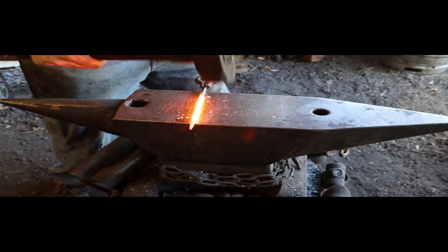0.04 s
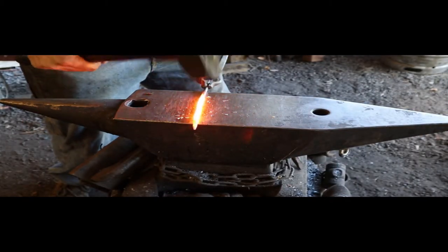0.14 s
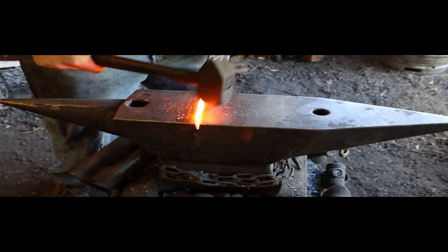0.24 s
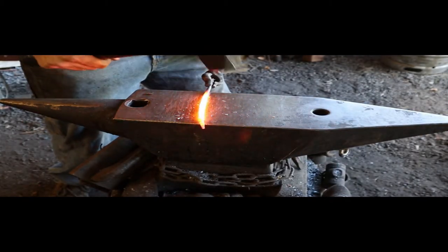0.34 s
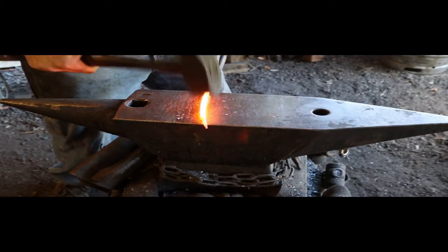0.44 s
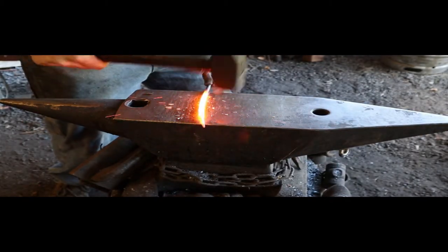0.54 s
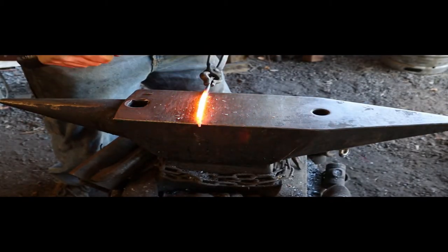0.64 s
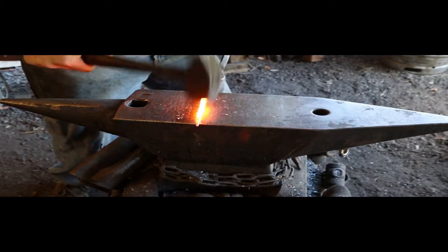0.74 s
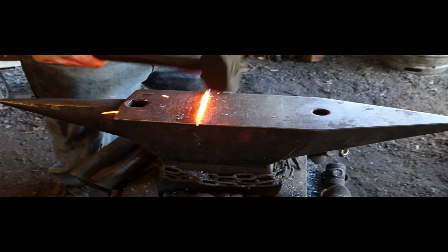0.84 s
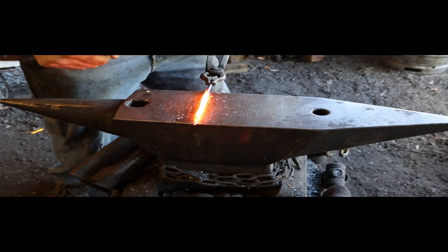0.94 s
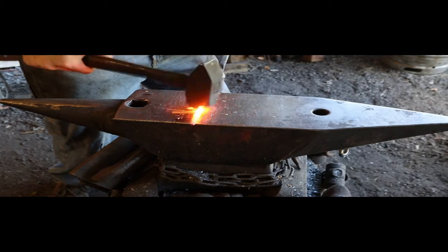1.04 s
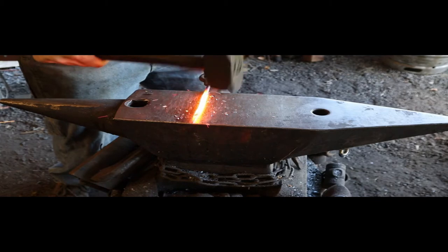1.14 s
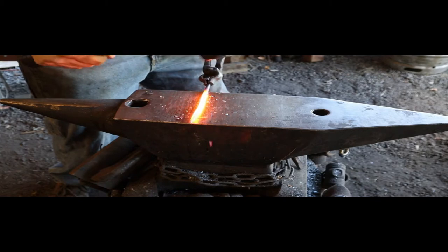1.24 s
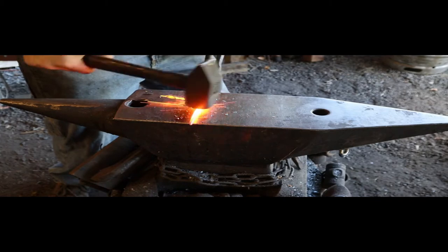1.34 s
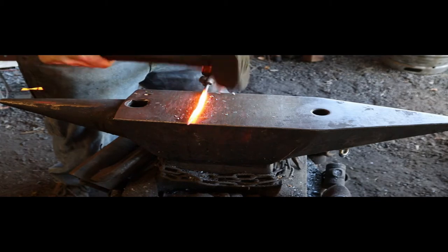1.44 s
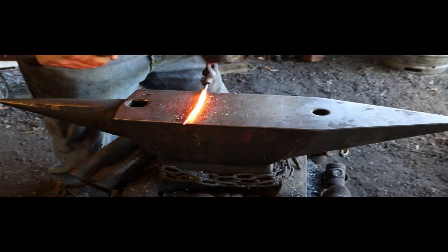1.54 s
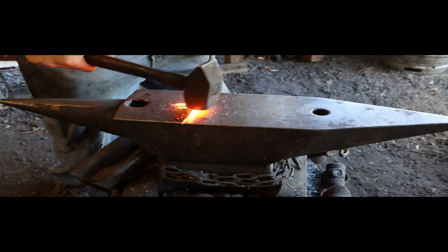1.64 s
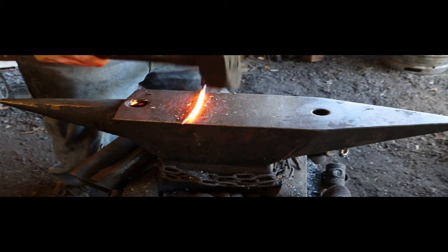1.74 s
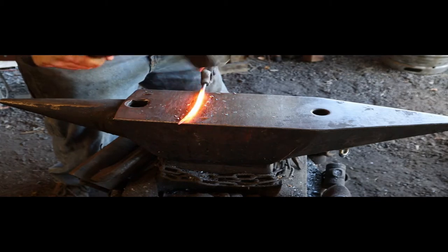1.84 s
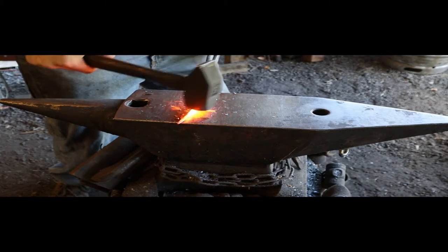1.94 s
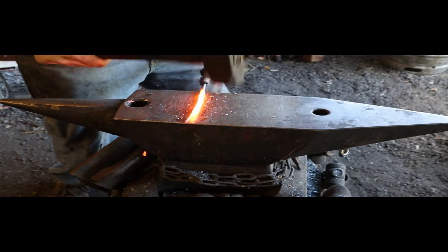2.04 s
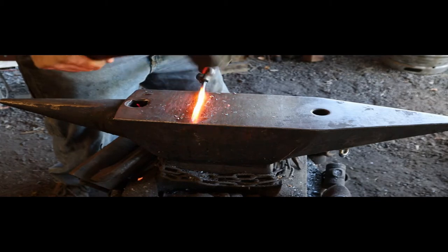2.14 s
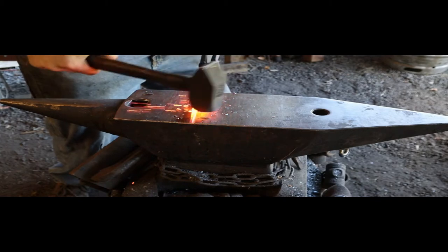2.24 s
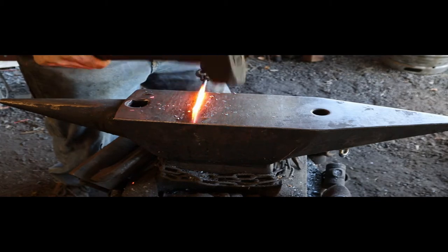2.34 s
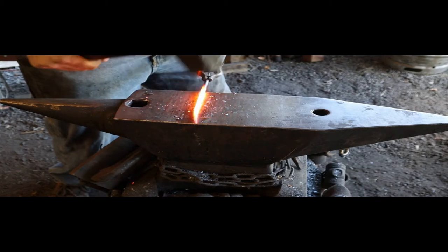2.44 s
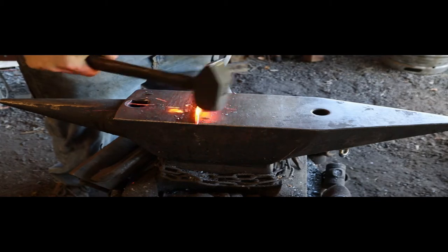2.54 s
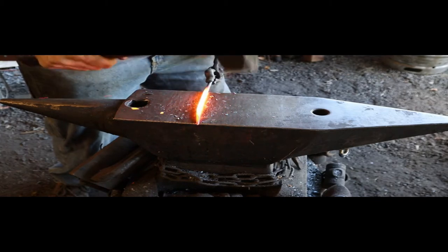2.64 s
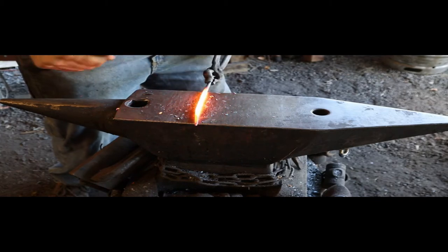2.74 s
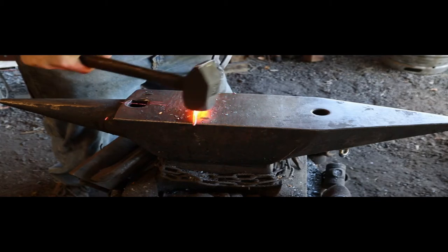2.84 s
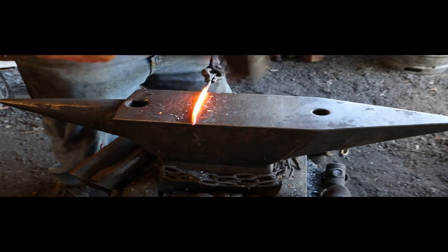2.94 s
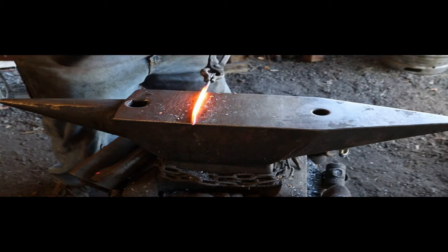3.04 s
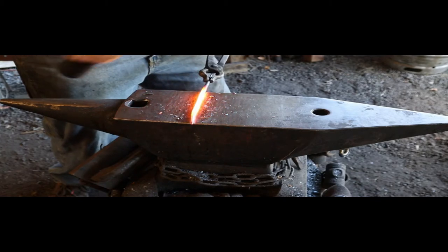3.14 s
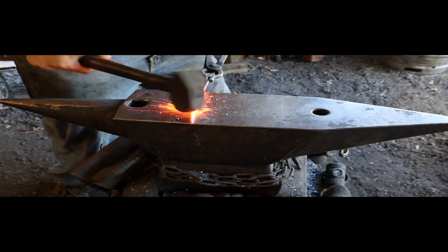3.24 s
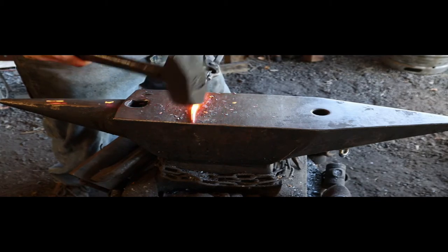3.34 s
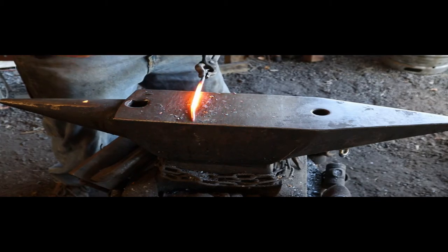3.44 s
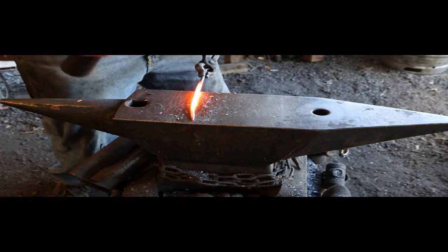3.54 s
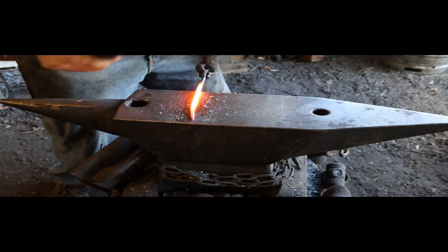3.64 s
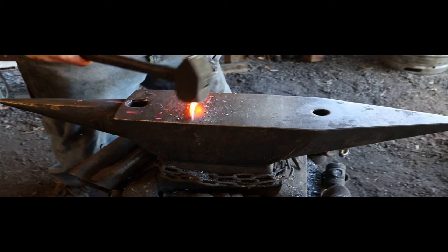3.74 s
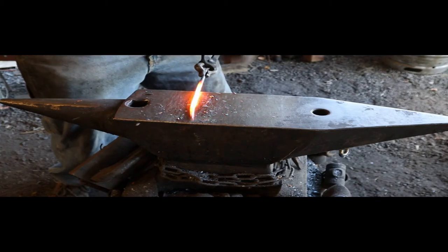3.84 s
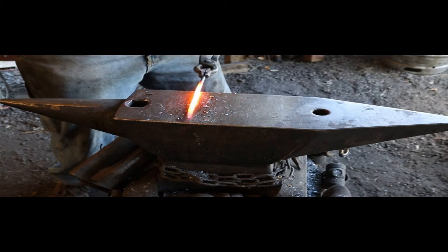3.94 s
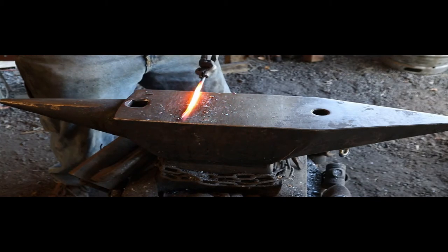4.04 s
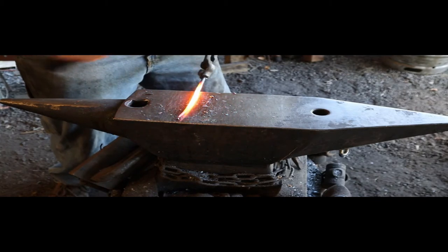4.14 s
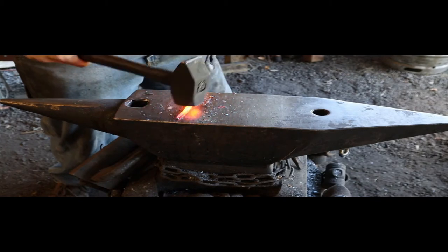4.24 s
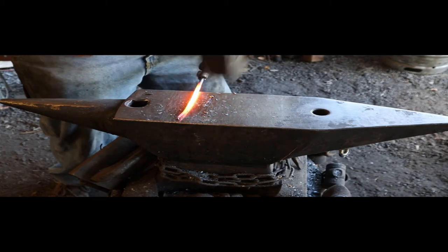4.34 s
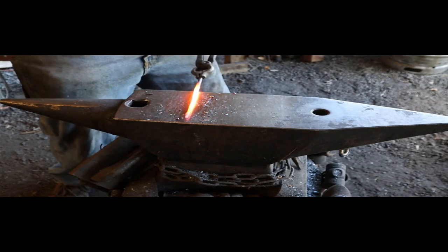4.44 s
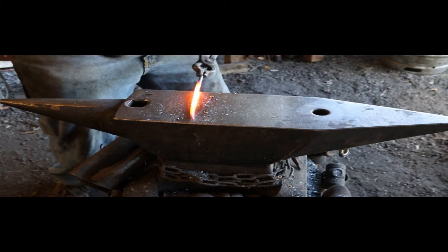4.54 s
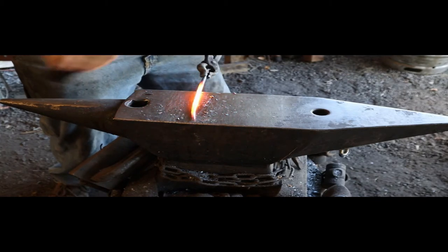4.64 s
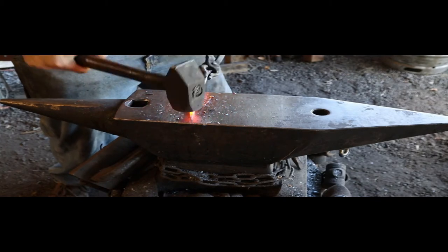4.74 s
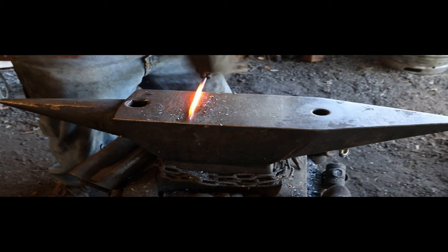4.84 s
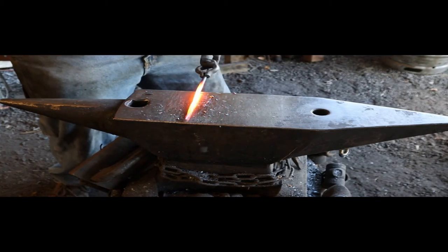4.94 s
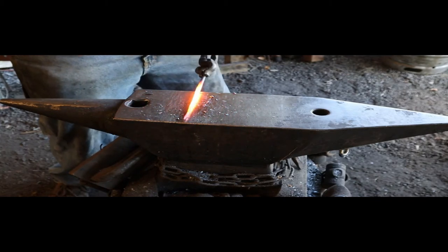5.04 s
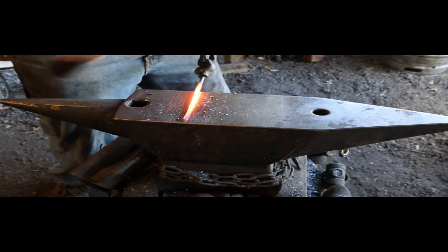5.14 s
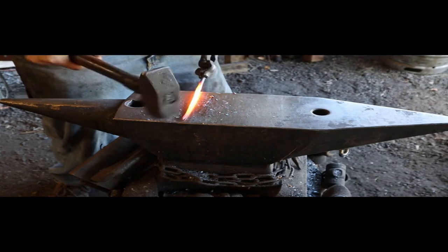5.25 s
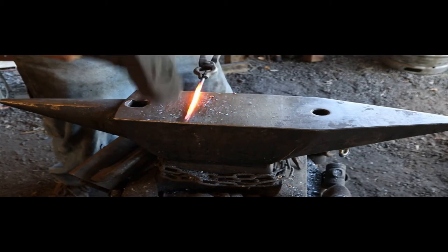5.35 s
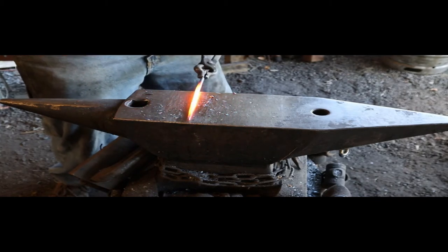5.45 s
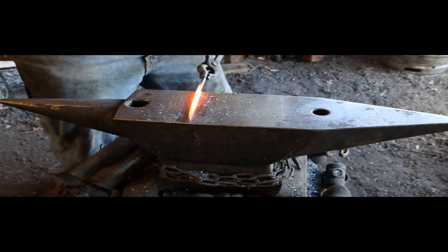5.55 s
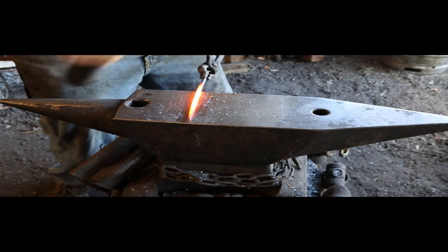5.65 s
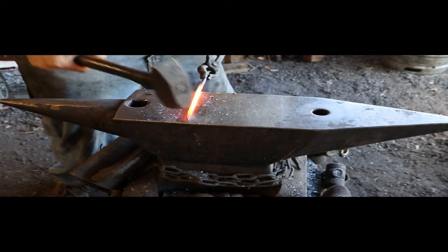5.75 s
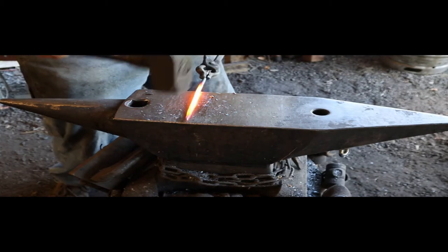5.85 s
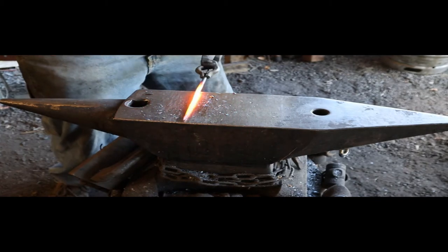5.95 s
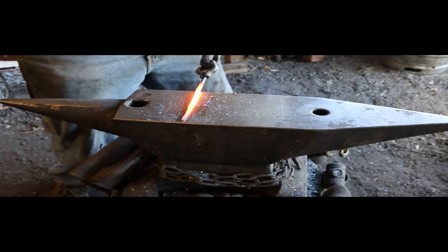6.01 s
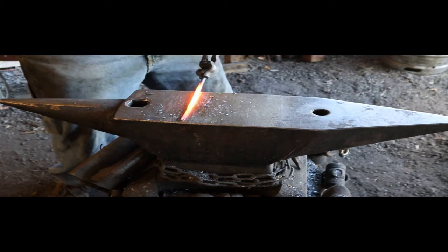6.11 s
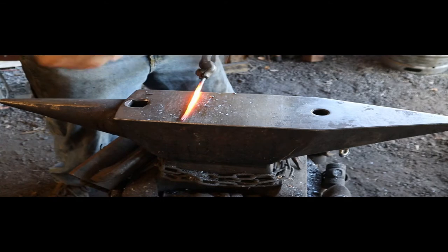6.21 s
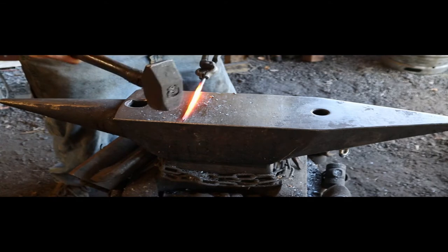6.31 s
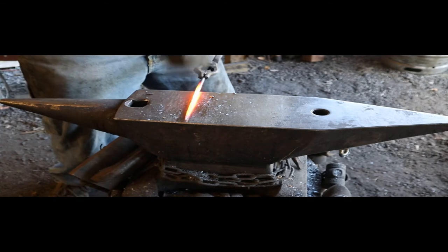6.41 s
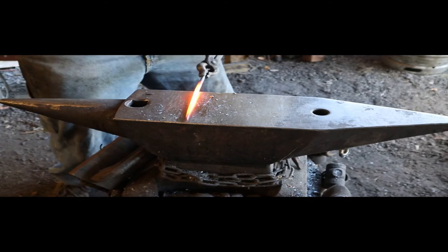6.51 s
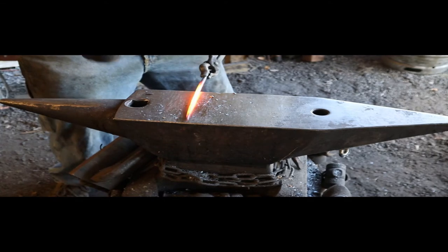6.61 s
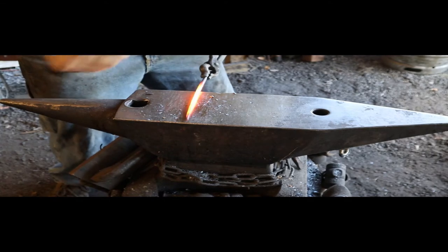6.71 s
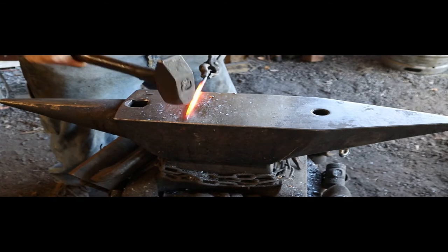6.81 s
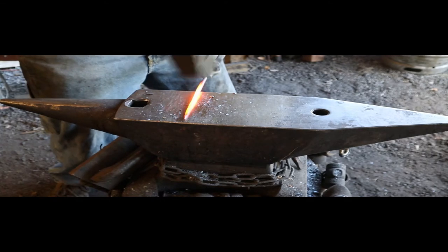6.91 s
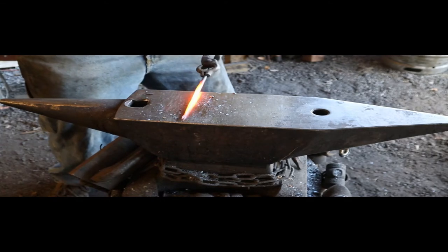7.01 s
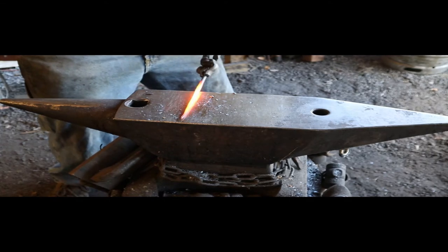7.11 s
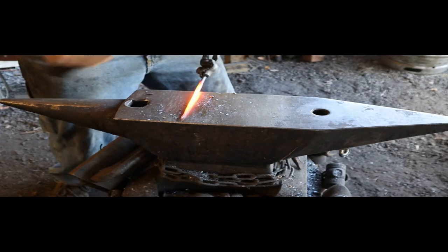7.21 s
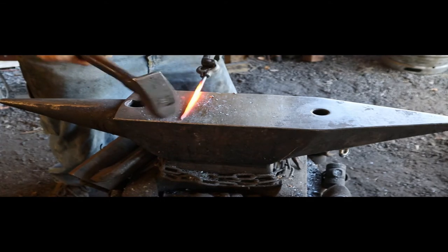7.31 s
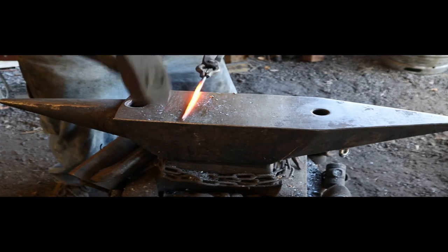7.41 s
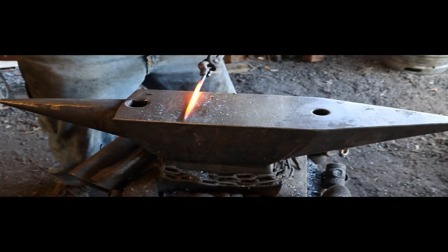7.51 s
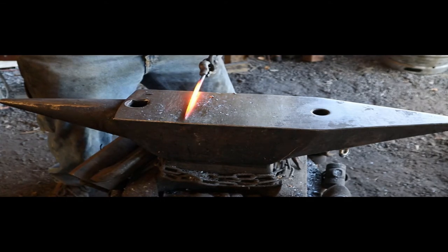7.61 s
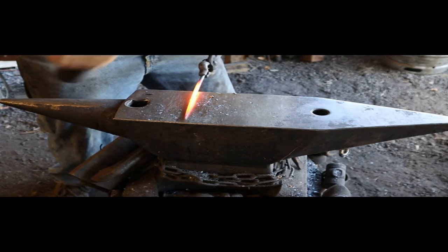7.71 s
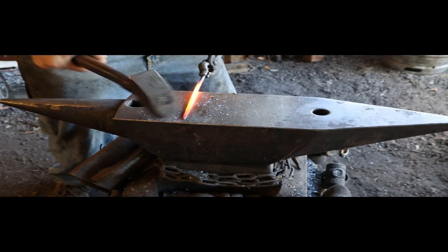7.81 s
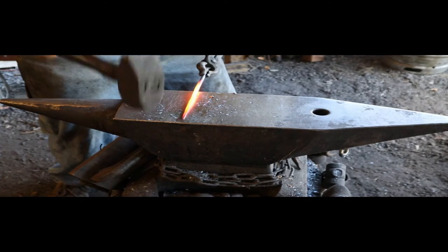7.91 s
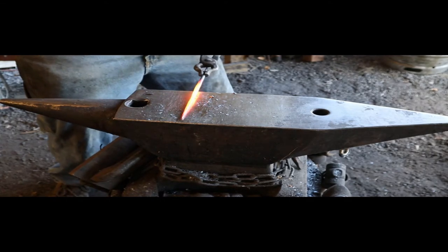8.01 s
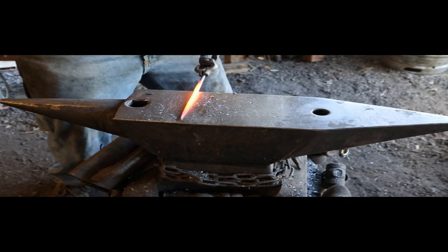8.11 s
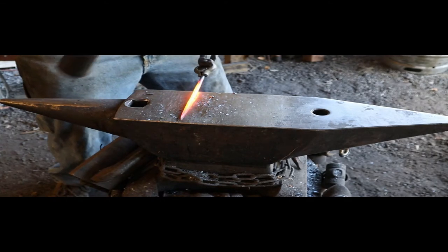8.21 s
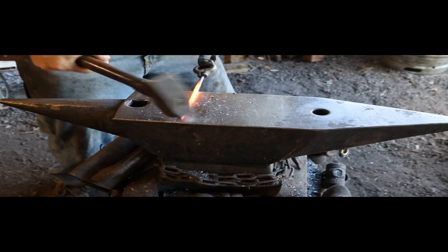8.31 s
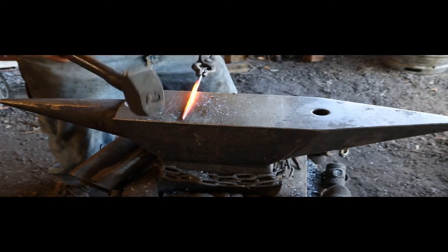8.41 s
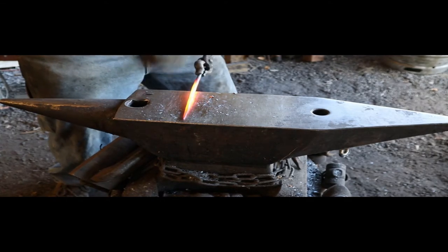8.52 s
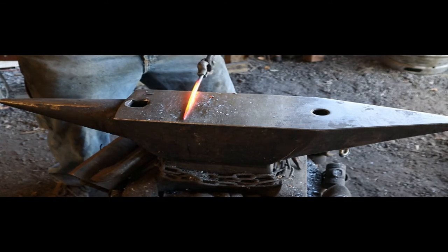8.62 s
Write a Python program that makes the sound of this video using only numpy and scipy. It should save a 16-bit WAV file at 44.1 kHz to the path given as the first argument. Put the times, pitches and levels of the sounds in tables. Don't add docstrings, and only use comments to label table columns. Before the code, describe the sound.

A hand hammer beats a hot steel bar on a chained anvil in an open shed, heard very close. Early blows come quickly, dull and thudding with a little scale hiss; later ones slow to about two a second and ring brighter as the bar cools. Chain and tongs jingle briefly after each hit. A high cricket trill and soft outdoor rumble fill the gaps.

```python
import sys
import numpy as np
from scipy import signal
from scipy.io import wavfile

SR = 44100
rng = np.random.default_rng(int(sys.argv[2]) if len(sys.argv) > 2 else 0)


def gain_from_decibels(decibels):
    exponent = np.asarray(decibels, float) / 20
    return 10 ** exponent


def generate_wav(signal):
    frames = np.transpose(np.atleast_2d(signal))
    scaled = np.clip(frames, -1, 1) * 32767
    pcm = np.round(scaled).astype(np.int16)
    wavfile.write(sys.argv[1], SR, pcm)


N = 382347
TAIL = 16000

# t/s, knock/dB, thud/dB, anvil ring/dB, hammer head/dB
BLOWS = [(0.0057, -49, -37.5, -59.5, -59), (0.2782, -41, -39, -50.5, -63), (0.5533, -41.5, -40, -59.5, -65),
         (0.8266, -45, -41, -57.5, -60.5), (1.1152, -40, -40.5, -54.5, -60),
         (1.405, -38.5, -43, -51.5, -54.5), (1.6941, -49, -40, -90, -61.5), (1.986, -41.5, -40, -52, -67),
         (2.2826, -41, -40, -52, -62), (2.5739, -43, -40, -57, -61.5), (2.8674, -55.5, -41.5, -78.5, -61),
         (3.179, -37.5, -39, -45.5, -56.5), (3.5949, -39, -36, -45, -55.5), (4.0388, -38, -34, -53, -60),
         (4.5633, -39, -33.5, -50.5, -60), (5.062, -33.5, -34, -43, -46), (5.565, -37, -32.5, -43.5, -49),
         (6.0767, -30, -34, -43, -45), (6.6041, -32, -33, -44, -47.5), (7.1166, -30.5, -35, -47.5, -46.5),
         (7.629, -33.5, -35, -44.5, -49), (8.138, -35, -34.5, -47, -47.5),
         (8.6604, -34.5, -31.5, -46.5, -60.5)]


def at_hz(points, hz):
    table_hz, values = np.transpose(points)
    return np.interp(np.log(hz), np.log(table_hz), values)


def rms_one(x):
    return x / np.sqrt(np.mean(x ** 2) + 1e-20)


def band_pass(x, low_hz, high_hz):
    return signal.sosfilt(signal.butter(2, [low_hz, high_hz], "band", fs=SR, output="sos"), x)


def noise_bands(size, likeness, low_hz=22):
    edges = low_hz * 2 ** np.arange(0, np.log2(19000 / low_hz), 0.5)
    white = rng.standard_normal((2, 2, size))
    for k, (low, high) in enumerate(zip(edges, edges[1:])):
        mid, side = band_pass(white[k % 2], low, high)
        hz = np.sqrt(low * high)
        alike = np.clip(at_hz(likeness, hz), -1, 1)
        yield hz, np.sqrt(1 + alike) * mid + np.sqrt(1 - alike) * side * [[1], [-1]]


def since_blow():
    t, blow_s = np.arange(N) / SR, np.array(BLOWS)[:, 0]
    last = np.maximum(np.searchsorted(blow_s, t) - 1, 0)
    return last, t - blow_s[last]


def air():
    # f/Hz, density/dB per Hz
    colour = [(22, -12), (50, -1.5), (100, -8.5), (220, -16), (800, -17.5), (4500, -29), (10000, -35.5),
              (15000, -63.5)]
    # f/Hz, left-right likeness
    likeness = [(60, 0.99), (150, 0.81), (380, 0.39), (950, -0.01), (2380, -0.41), (5980, 0.3),
                (15000, 0.98)]
    floor = sum(gain_from_decibels(at_hz(colour, hz)) * band for hz, band in noise_bands(N, likeness))
    return gain_from_decibels(-58.5) * rms_one(floor) * gain_from_decibels([[-0.8], [0.8]])


def crickets(strokes_per_s, top_hz, fall_hz):
    # t/s, lead/strokes, level/dB
    trill = [
        (0, 0.27, -65),
        (1.2, 0.44, -66),
        (2.15, 0.74, -69),
        (2.9, 0.95, -66),
        (3.9, 0.86, -66.5),
        (5.9, 0.84, -69),
        (6.3, 0.45, -77),
        (6.9, 0.84, -67.5),
        (7.4, 0.89, -68),
        (8.67, 0.84, -68),
    ]
    # f/Hz, width/Hz, level/dB
    far = [(3420, 260, -77), (5600, 450, -82), (7500, 800, -78)]
    t = np.arange(N) / SR
    s, lead, db = np.transpose(trill)
    stroke = (strokes_per_s * t + np.interp(t, s, lead) + 0.5) % 1
    pulses = [(0.2, 0.6), (0.48, 0.85), (0.72, 1)]
    swell = sum(size * np.exp(-((stroke - at) / 0.11) ** 2) for at, size in pulses)
    pitch = top_hz - fall_hz * np.clip(stroke - 0.55, 0, 1) ** 2
    rough = signal.lfilter([1], [1, -0.96], rng.standard_normal(N))
    uneven = 1 + 0.6 * rms_one(rough)
    tone = np.sin(2 * np.pi * np.cumsum(pitch) / SR)
    level = gain_from_decibels(np.interp(t, s, db) + 6.0)
    out = level * uneven * swell * tone * gain_from_decibels([[-1.2], [0]])
    for hz, width_hz, db in far:
        chorus = band_pass(rng.standard_normal((2, N)), hz - width_hz / 2, hz + width_hz / 2)
        out = out + gain_from_decibels(db) * rms_one(chorus)
    return out


def ground():
    # f/Hz, delay/s, spread/s, level under the thud/dB
    thump = (40, .068, .03, -11)
    hz, delay_s, spread_s, under_db = thump
    last, since = since_blow()
    swell = np.exp(-((since - delay_s) / spread_s) ** 2)
    return gain_from_decibels(np.array(BLOWS)[last, 2] + under_db) * swell * np.cos(2 * np.pi * hz * (since - delay_s))


def sizzle(fade_s):
    # t/s, level/dB
    heat = [
        (0, -43),
        (1, -62),
        (3.002, -58),
        (4.499, -60),
        (8.67, -92),
    ]
    # t/s, level/dB
    flakes = [
        (3.934, -63.5),
        (4.33, -61.5),
        (5.0388, -61),
        (5.398, -57.5),
        (5.432, -65.5),
        (5.501, -59),
        (5.525, -65),
    ]
    grains = rms_one(rng.standard_normal((2, N)) * gain_from_decibels(2.5 * rng.exponential(1, N)))
    heat_db = np.interp(np.arange(N) / SR, *np.transpose(heat))
    grains = grains * gain_from_decibels(heat_db - 60 * np.abs(since_blow()[1]) / fade_s)
    for s, db in flakes:
        grains[:, round(s * SR):][:, :40] += gain_from_decibels(db) * rng.standard_normal(40)
    return band_pass(grains, 5500, 13000)


def rattle(crack_db, crack_s, t60):
    # f/Hz, density/dB per Hz
    loose_iron = [(2200, -6.5), (3300, -2), (5400, -6), (7600, -12), (8600, -1.5), (10600, 2.5),
                  (12200, -11.5), (15500, -35.5)]
    # f/Hz, left-right likeness
    likeness = [(2000, .4), (5000, 0.12), (8000, 1), (15000, 0.71)]
    last, since = since_blow()
    knock_db, head_db = np.array(BLOWS)[last][:, [1, 4]].T
    jingle = gain_from_decibels(-60 * (since - 0.08) / t60)
    crack = gain_from_decibels(crack_db - 60 * since / crack_s)
    out = 0
    for hz, band in noise_bands(N, likeness, low_hz=1985):
        high = np.clip(np.log2(hz / 3500) / 2.9, 0, 1)
        drive_db = (1 - high) * (knock_db - 5.5) + high * (head_db - 12.0)
        out = out + band * gain_from_decibels(at_hz(loose_iron, hz) + drive_db)
    return (since > 0) * (jingle + crack) * out


def shed(wet_db):
    # f/Hz, t60/s
    decay = [(150, .36), (400, 0.33), (1000, 0.24), (2800, 0.25), (7000, 0.22), (14000, 0.081)]
    # f/Hz, left-right likeness
    likeness = [(60, 0.94), (150, 0.97), (380, 0.93), (950, 0.69), (2380, 0.35), (5980, 0.08),
                (15000, 0.95)]
    # t/s, level over the diffuse tail/dB
    echoes = [
        (0.009, 6.5),
        (0.012, 3.5),
        (0.036, 0),
        (0.043, -5),
        (0.057, 5),
    ]
    # t/s, level/dB
    slaps = [
        (.0328, -20),
        (0.015, -23),
    ]
    t = np.arange(TAIL) / SR
    tail = sum(band * gain_from_decibels(-60 * t / at_hz(decay, hz)) for hz, band in noise_bands(TAIL, likeness))
    lumps_db = sum(db * np.exp(-((t - s) / 0.0022) ** 2) for s, db in echoes)
    onset = np.clip((t - 0.002) / 0.0058, 0, 1)
    response = gain_from_decibels(wet_db + lumps_db) * tail * onset
    response[:, 0] = 1
    for s, db in slaps:
        response[:, round(s * SR)] += gain_from_decibels(db)
    return response


def aside(room):
    return np.array([room[0], np.roll(room[1], 2)])


def struck(modes, room, turn, rise_s):
    hz, db, t60 = np.transpose(modes)[:, :, None, None]
    t = np.arange(TAIL) / SR
    apart = turn * rng.uniform(0.18, 1, hz.shape) * [[1], [-1]]
    dying = gain_from_decibels(db - 60 * t / t60) * (1 - np.exp(-t / rise_s))
    dry = dying * np.sin(2 * np.pi * hz * t + apart)
    heard = signal.fftconvolve(dry, room[None], axes=2)[:, :, :TAIL]
    together = heard.sum(axis=0).mean(axis=0)
    return heard / np.sqrt(np.mean(together[2600:4400] ** 2))


def anvil(room):
    # f/Hz, level/dB, t60/s
    knock = [(1210, -2.5, .009), (1459, 11, 0.005), (1674, 5, 0.0054), (1903, -6.5, 0.0074),
             (2500, -6.5, 0.0075), (3245, -11.5, 0.012), (4740, -11, 0.0053), (6376, -20.5, 0.013)]
    # f/Hz, level/dB, t60/s
    thud = [(233, -10.5, 0.0087), (336, 6.5, 0.015), (415.5, -25, 0.21), (496, -8, 0.03)]
    # f/Hz, level/dB, t60/s
    stand = [(817.6, -26.5, 0.29), (908.8, 5, 0.023), (1000, -3.5, 0.033), (749.3, -21.5, 0.11)]
    return [(struck(knock, room, turn=0.13, rise_s=0.003), -3, 1.5),
            (-struck(thud, room, turn=0.05, rise_s=0.003), -3, 1.2),
            (struck(stand, room, turn=0.1, rise_s=0.0017), -3, 1.2)]


def iron(room, near):
    # f/Hz, level/dB, t60/s
    bend = [(2110, 0, .17), (1841, -7, .15), (1690, -9, .13), (2649, -20, .15)]
    # f/Hz, level/dB, t60/s
    head = [(8900, -1, 0.013), (9900, -2, 0.009), (10600, 1, .014), (11550, -1, .012), (13500, -10, .008)]
    # f/Hz, level/dB, t60/s
    families = [
        [(3650, 0, .2), (3755, -7, .09), (3560, -12, .08)],
        [(4180, 0, .13), (5114, -10, .12), (4740, -20, .08)],
        [(6080, 0, .13), (5790, -9, .09), (6982, -10, .1), (6600, -16, .08)],
        [(8660, 0, .14), (8505, -6, .1), (8890, -7, .1), (8990, -3, .13), (9720, -10, .09)],
        [(10640, 0, .14), (10150, -9, .1), (10277, -4, .12), (10355, -5, .1), (10760, -6, .1), (11380, -9, .1),
         (11490, -5, .12), (11570, -4, .13), (11940, -9, .06)],
    ]
    bodies = [(struck(bend, aside(near), turn=0.2, rise_s=0.00084), -3, 1.5),
              (struck(head, room, turn=0.57, rise_s=0.0007), -12, 3)]
    for family in families[:2]:
        bodies.append((struck(family, aside(near), turn=0.17, rise_s=0.0002), -3, 1.5))
    for family in families[2:]:
        bodies.append((struck(family, near, turn=0.3, rise_s=0.0002), -3, 2.5))
    return bodies


def body_levels():
    # level at a middling blow/dB, slope/dB per dB of anvil ring, slope/dB per dB of hammer head
    family_laws = [(-52.5, 1.0, 0.0), (-59, 0.48, 0.96), (-65.5, 0.74, 0.8), (-69.5, -0.4, 1.76),
                   (-74.5, -0.2, 1.47)]
    mean_knock_db, mean_ring_db, mean_head_db = -40, -50, -55
    glancing_db = -54.5
    s, knock, thud, ring, head = np.transpose(BLOWS)
    stand = thud + 0.5 * np.minimum(ring - glancing_db, 0)
    bend = -50 + 1.7 * (knock - mean_knock_db)
    upper = [db + by_ring * (ring - mean_ring_db) + by_head * (head - mean_head_db)
             for db, by_ring, by_head in family_laws]
    return np.transpose([knock, thud, stand, bend, head, *upper])


def hammering():
    rooms = [shed(wet_db=-41) for spot in range(3)]
    spots = [anvil(aside(room)) for room in rooms]
    upper = iron(rooms[0], shed(wet_db=-49))
    link_t60_s = 0.12
    damped = gain_from_decibels(-60 * np.arange(TAIL) / SR / link_t60_s)
    out = np.zeros((2, N + 2 * TAIL))
    for k, (blow, levels) in enumerate(zip(BLOWS, body_levels())):
        at = round(blow[0] * SR)
        bodies = spots[k % len(spots)] + upper
        for (modes, trim_db, scatter_db), db in zip(bodies, levels):
            shares = gain_from_decibels(db + trim_db + scatter_db * rng.standard_normal(len(modes)))
            out[:, at:at + TAIL] += np.tensordot(shares, modes, 1)
        for (modes, *rest), db in zip(bodies[-2:], levels[-2:]):
            for link in modes:
                late = at + round(rng.uniform(0.012, 0.075) * SR)
                clink_db = db - 6 + 4 * rng.standard_normal()
                out[:, late:late + TAIL] += gain_from_decibels(clink_db) * link * damped
    return out[:, :N]


def scene():
    forge = hammering() + rattle(crack_db=42.5, crack_s=0.036, t60=0.19) + sizzle(fade_s=1.0)
    forge = signal.sosfilt(signal.butter(3, 170, "high", fs=SR, output="sos"), forge)
    return forge + ground() + crickets(27.4, top_hz=7820, fall_hz=4500) + air()


def top_cut(x):
    return signal.sosfilt(signal.butter(12, 16580, fs=SR, output="sos"), x)


def record(dry):
    threshold_db, release_db_per_s, attack_s = -2.5, 230, 0.0025
    over_db = np.maximum(20 * np.log10(np.abs(dry).max(axis=0) + 1e-9) - threshold_db, 0)
    ramp = release_db_per_s * np.arange(N) / SR
    peaks_db = np.maximum.accumulate(np.where(over_db > 0, over_db + ramp, 0))
    duck_db = np.maximum(peaks_db - ramp, 0)
    keep = np.exp(-1 / (attack_s * SR))
    x = dry * gain_from_decibels(-signal.lfilter([1 - keep], [1, -keep], duck_db))
    x = 0.98 * x / (1 + np.abs(x).max(axis=0) ** 4) ** 0.31
    x = signal.sosfilt(signal.cheby2(12, 60, 16850, fs=SR, output="sos"), x)
    x = signal.sosfilt(signal.butter(1, 30, "high", fs=SR, output="sos"), x)
    return top_cut(x)


dry = scene()
out = record(dry)
generate_wav(out)
```